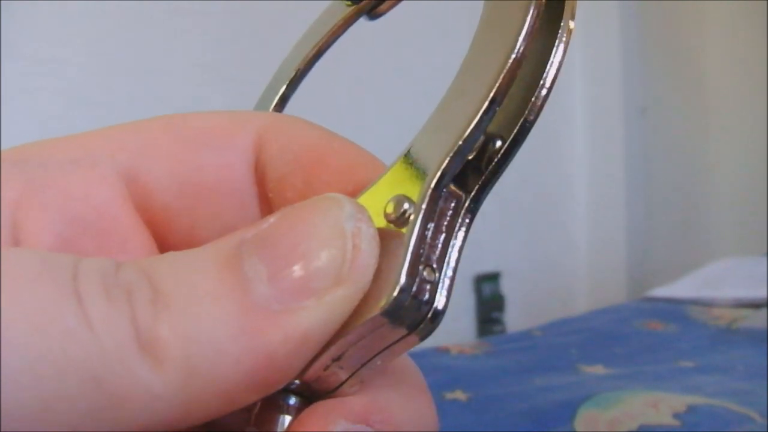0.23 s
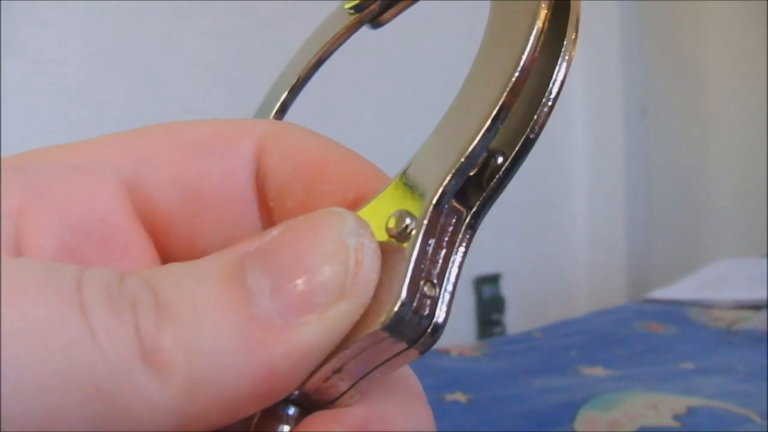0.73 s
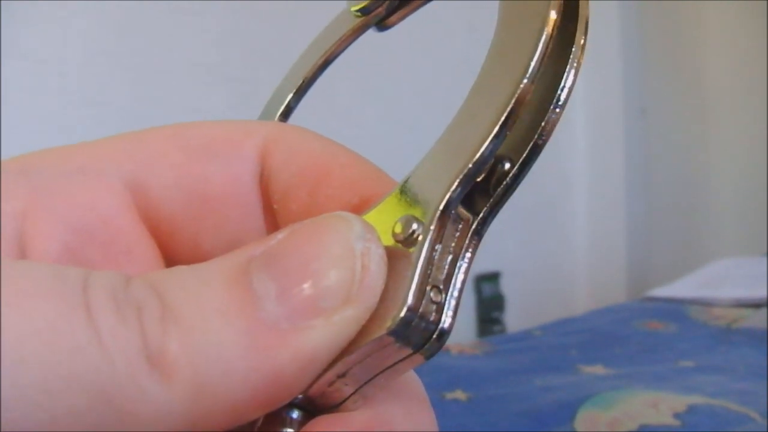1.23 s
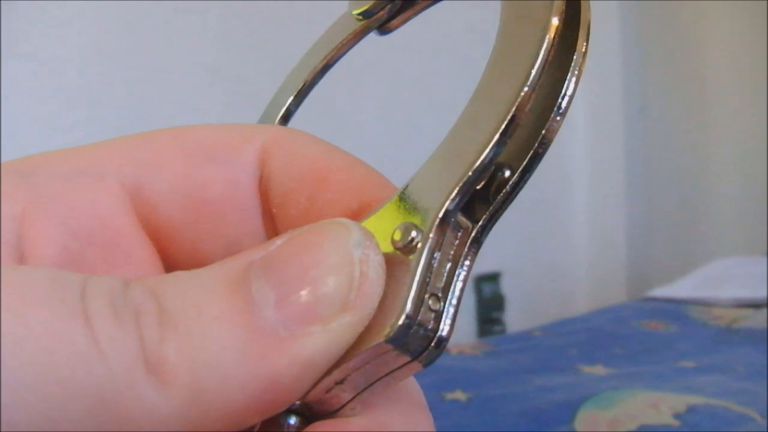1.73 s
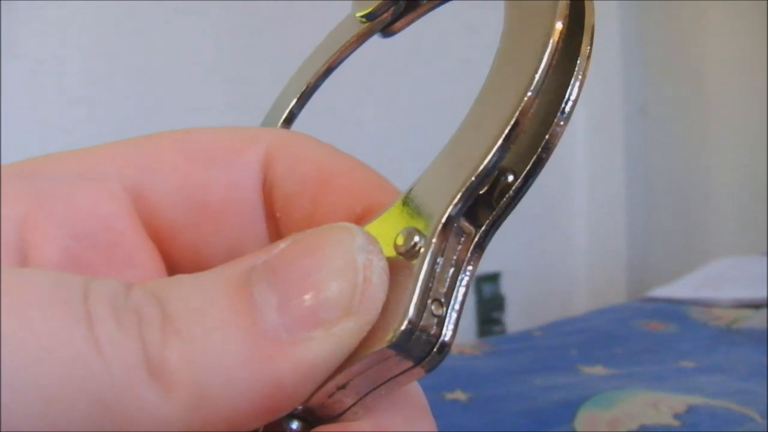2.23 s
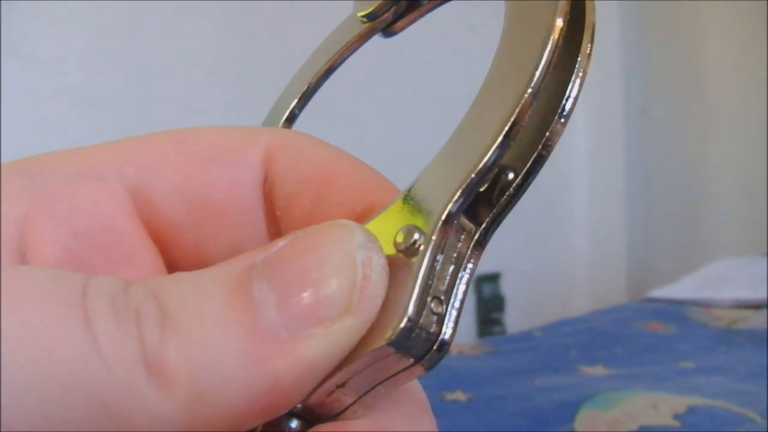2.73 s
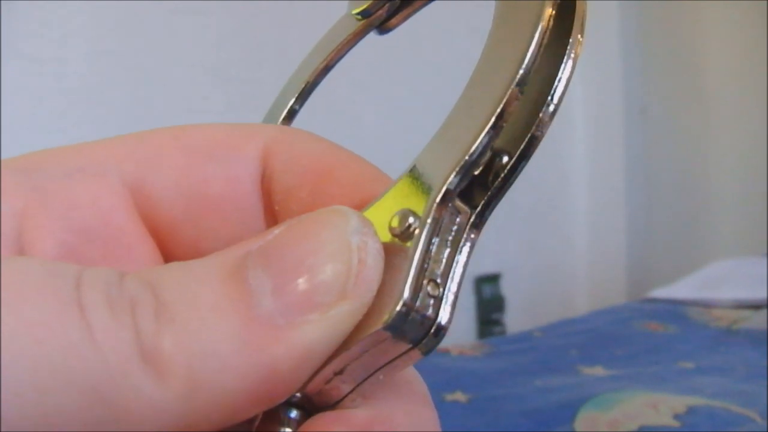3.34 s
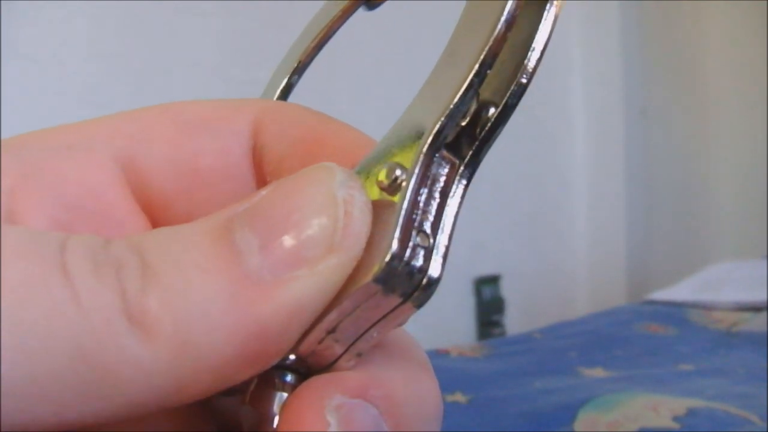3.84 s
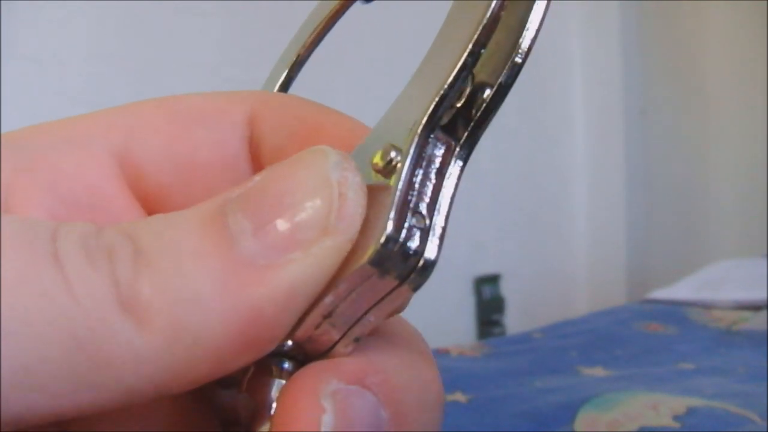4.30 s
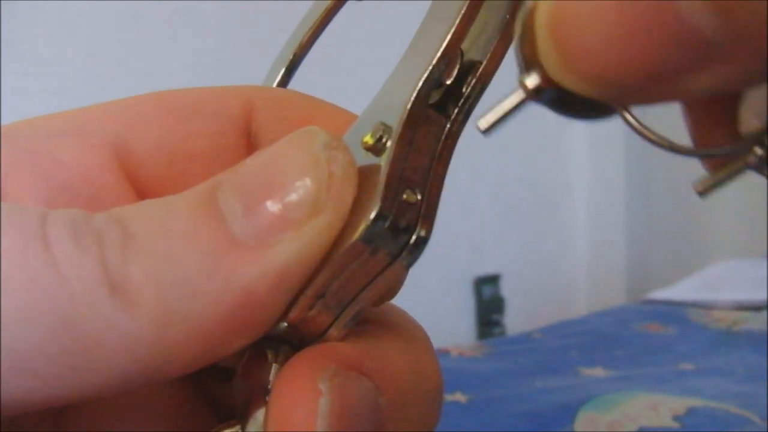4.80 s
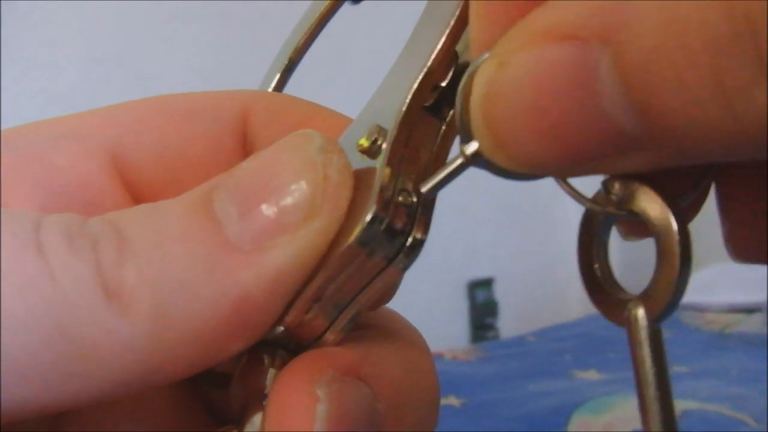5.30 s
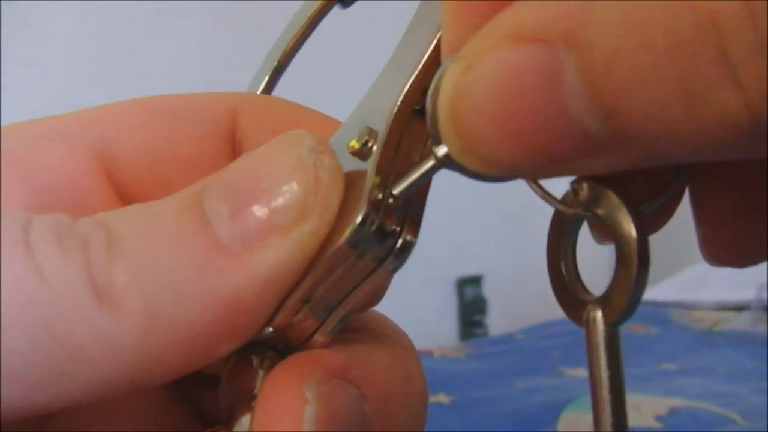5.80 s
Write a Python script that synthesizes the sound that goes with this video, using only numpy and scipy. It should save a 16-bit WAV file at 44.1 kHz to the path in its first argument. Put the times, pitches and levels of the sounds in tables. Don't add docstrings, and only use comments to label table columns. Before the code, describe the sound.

Small steel keys on a ring jingle and tick brightly up close in a quiet bedroom, then one key knocks into a metal lock.

```python
import sys
import numpy as np
from scipy import signal
from scipy.fft import rfft, irfft, next_fast_len
from scipy.io import wavfile
from scipy.ndimage import uniform_filter1d

SR = 44100
rng = np.random.default_rng(int(sys.argv[2]) if len(sys.argv) > 2 else 0)


def wav_out(sig):
    wavfile.write(sys.argv[1], SR, np.round(np.clip(np.atleast_2d(sig).T, -1, 1) * 32767).astype(np.int16))


def volts_from_decibels(level):
    exponent = np.asarray(level, float) / 20
    return 10 ** exponent


N = 266893
EDGE_HZ = 15850

# start in seconds, level of each of the three key modes
# in dB, damping in dB per second (below zero the ring grows).
BLOWS = [(0.6445, -33, -53, -28, 700), (0.7729, -36, -33, -49, 330), (0.8026, -41, -24.5, -46, 200),
         (0.822, -45, -30.5, -50, 20), (0.8863, -45, -59, -46, 150), (0.91, -49, -49, -58, 140),
         (0.936, -48, -45, -54, 570), (0.952, -54.5, -62.5, -51.5, 352), (1.3837, -39, -37.5, -50, 914),
         (1.409, -40, -42, -52, 780), (1.4532, -52, -50.5, -56, -250), (1.477, -45.5, -44, -51, -40),
         (1.564, -36.5, -48, -57, -700), (1.5705, -32.5, -48, -56, 1400), (2.0355, -44, -38.5, -61, 299),
         (2.341, -41, -58, -60, 1000), (2.39, -56, -61, -52, 590.5), (2.507, -24.5, -35, -15.5, 800.5),
         (2.5178, -33, -39, -21.5, 300), (2.522, -37, -27, -36, 620), (2.61, -60, -49, -52.5, 410),
         (2.7055, -43.5, -62, -60, 340), (2.746, -57, -58, -58, 294), (3.633, -39, -62, -64, 2000),
         (4.0736, -35, -42, -28.5, 3000), (4.078, -43.5, -50, -42.5, 700), (5.06, -43, -35, -55, 850),
         (5.2031, -69, -57, -58, 630)]


def evened(x):
    return x / np.sqrt(np.mean(x ** 2) + 1e-20)


def read(points, hz):
    f, value = np.transpose(points)
    return np.interp(np.log(hz + 1), np.log(f + 1), value)


def add(mix, s, sound):
    part = mix[:, round(s * SR):][:, :sound.shape[1]]
    part += sound[:, :part.shape[1]]


def coloured(x, gain):
    size = x.shape[-1]
    fast = next_fast_len(size)
    return irfft(rfft(x, fast) * gain(np.fft.rfftfreq(fast, 1 / SR)), fast)[..., :size]


def hiss():
    # frequency in Hz, level in dB per Hz.
    hiss_colour = [(12, -32), (20, 4), (50, -1), (130, -1.5), (300, -6), (825, -12), (3000, -18.5),
                   (7730, -25), (10500, -28.5), (15200, -33.5), (15800, -40)]
    # frequency in Hz, left over right in dB.
    hiss_balance = [(60, 2.5), (1000, 2), (8000, -0.5)]
    hiss_db, whine_hz, whine_db = -55.5, 10840, -80
    side = np.array([[.5], [-.5]])
    noise = rng.standard_normal((3, N))
    shared = coloured(noise[2], lambda hz: 0.48 + .5 / (1 + hz / 700))

    def microphone(hz):
        return volts_from_decibels(read(hiss_colour, hz) + side * read(hiss_balance, hz)) * (hz < EDGE_HZ)

    noise = coloured(noise[:2] + shared, microphone)
    waver_hz = 25 * evened(uniform_filter1d(rng.standard_normal(N), size=900))
    whine = volts_from_decibels(whine_db + 3.0) * np.sin(2 * np.pi * np.cumsum(whine_hz + waver_hz) / SR)
    return volts_from_decibels(hiss_db + 2.5) * evened(noise) + whine


def direction(t):
    # time in seconds, left over right in dB, left lag in microseconds.
    swing = [(0.645, -4, 93), (0.775, -1, 107), (0.805, -7, 61), (0.9, -7, 91), (1.385, 0, 98),
             (1.46, -1, 84), (2.036, -4, 76), (2.2, -3, 79), (2.508, -1.5, 84), (2.56, 5, 93),
             (2.71, -2, 82), (3.54, -4, 82), (3.75, 2, 73), (3.92, 4, 69), (4.03, 0, 80), (4.075, 2, 68),
             (5.062, -2, 73), (5.203, 4, 66)]
    s, pan_db, lag = np.transpose(swing)
    half_db = np.interp(t, s, pan_db) / 2
    return volts_from_decibels(np.array([half_db, -half_db])), np.interp(t, s, lag) * 1e-6


def contacts():
    # start in seconds, low mode in dB, high mode in dB, damping in dB per second.
    grazes = [(0.385, -56, -69, 1500), (0.542, -65, -73, 500), (0.659, -59, -52, 600),
              (0.846, -43, -34, 600), (1.014, -58, -64, 400), (1.438, -55, -59, 860),
              (1.502, -57, -44, 250), (1.596, -62, -53, 300), (1.636, -39.5, -62, 1260),
              (1.647, -58, -59, 158), (2.059, -53, -48.5, 420), (2.237, -58, -54, 450),
              (2.356, -52, -59, 100), (2.426, -57, -51.5, 146), (2.913, -54.5, -69, 330),
              (3.06, -42, -51.5, 1043), (3.209, -57, -77, 148), (3.464, -57, -59, 225),
              (3.515, -56, -56, 100), (3.534, -53, -49, 340), (3.576, -64, -52, 730),
              (3.789, -59, -72, 120), (3.889, -63, -73, 717), (3.912, -60, -51, 90),
              (3.943, -65, -49.5, 350), (4.007, -60, -52, 900), (4.045, -63, -50, 500),
              (4.086, -55, -44, 350), (4.095, -69, -49.5, 720), (5.074, -58, -46, 150),
              (5.095, -62, -49, 600)]
    # start in seconds, low mode in dB, high mode in dB.
    holds = [(0.785, -46, -38), (1.525, -56, -49.5), (1.538, -48, -49.5), (1.581, -52, -49.5),
             (2.011, -51, -60), (2.191, -53, -56), (2.298, -50, -68), (2.32, -45, -66), (2.413, -52.5, -62),
             (2.554, -54, -42.5), (3.417, -61, -73), (3.552, -71, -49), (3.656, -67, -72),
             (3.727, -69, -59.5), (3.964, -59, -58), (4.026, -47, -48.5), (5.021, -62, -66)]
    # start in seconds, low mode in dB, high mode in dB.
    swells = [(0.519, -62, -83), (0.755, -62, -55), (1.395, -45, -57), (2.171, -52, -63.5),
              (2.211, -65.5, -66), (2.325, -69, -75), (2.586, -74, -46), (2.794, -58, -66)]
    stills = [
        0,
        2.818,
        4.119,
        5.116,
        5.228,
    ]
    hold_db_per_s, swell_db_per_s = 43, 296
    twin_db = -15.5
    light = grazes + [(*r, -hold_db_per_s) for r in holds] + [(*r, -swell_db_per_s) for r in swells]
    rows = BLOWS + [(s, low, high, high + twin_db, damp) for s, low, high, damp in light]
    return np.array(sorted(rows + [(s, -90, -90, -90, 0) for s in stills]))


def ring_levels(t):
    rows = contacts()
    now = np.clip(np.searchsorted(rows[:, 0], t) - 1, 0, None)
    db = rows[now, 1:4].T - rows[now, 4] * (t - rows[now, 0])
    return np.sqrt(np.maximum(volts_from_decibels(2 * db) - volts_from_decibels(2 * -77), 0)), now


def rings():
    key_modes = [7635, 10605, 10725]
    flutter_samples = (170, 300, 300)
    t, starts = np.arange(N) / SR, contacts()[:, 0]
    levels, now = ring_levels(t)
    before, after = (ring_levels(starts + gap)[0].sum(0) for gap in (-1e-4, 1e-4))
    hard = np.isin(starts, [blow[0] for blow in BLOWS])
    raised = after > np.where(hard, 1.3, 3.5) * before
    struck = np.maximum.accumulate(np.where(raised, starts, 0))[now]
    gains, lag = direction(t)
    out = np.zeros((2, N))
    for k, (hz, rough, span) in enumerate(zip(key_modes, (.75, .12, .15), flutter_samples)):
        rough = rough * (1 - np.exp(-(t - starts[now]) / 0.0085))
        flutter = []
        for noise in rng.standard_normal((2, N)):
            smooth = uniform_filter1d(uniform_filter1d(noise, size=span), size=span)
            flutter.append(evened(smooth))
        release = signal.lfilter([.012], [1, -.988], levels[k])
        level = np.maximum(uniform_filter1d(levels[k], size=13), release)
        level = level * (1 + rough * flutter[0]) / np.sqrt(1 + rough ** 2)
        shake = shake if k == 2 else flutter[1]
        turn = 2 * np.pi * hz * (t - struck) + (1.3 if k == 0 else 0.68) * shake
        if k == 0:
            out += level * np.sin([turn + 2.23, turn])
        else:
            out += level * gains * np.sin([turn - 2 * np.pi * hz * lag, turn])
    return coloured(out, lambda hz: (hz < EDGE_HZ) / (1 + (4000 / (hz + 1)) ** 4))


def scrape():
    power = (ring_levels(np.arange(N) / SR)[0] ** 2 * [[2.5], [.05], [.3]]).sum(0)
    keep = np.exp(-1 / (0.0046 * SR))
    slide = signal.lfilter([1 - keep], [1, -keep], power ** 0.27)
    clicks = (rng.random(N) < 1500 / SR) * volts_from_decibels(5.0 * np.minimum(rng.exponential(1, N), 3.5))
    grit = 0.29 + signal.lfilter([1], [1, -.93], clicks)
    grains = rng.standard_normal((2, N)) * grit / grit.mean() * slide
    colour = [(1600, -9), (2350, 2.0), (3300, -18), (5000, -7.0), (7700, 4.0), (9500, -2.0),
              (13500, -3.5), (15800, -6.0)]
    spread = grains + 0.19 * grains[::-1]
    return volts_from_decibels(-37.5) * coloured(spread, lambda hz: volts_from_decibels(read(colour, hz)) * (hz < EDGE_HZ))


def hand(hz):
    palm_share, palm_s = 0.2, 0.000534
    return 1 + palm_share * np.exp(-2j * np.pi * hz * palm_s) / (1 + (hz / 7000) ** 4)


def ticks():
    # frequency in Hz, level in dB, t60 in seconds.
    small_modes = [(7160, -25.5, 0.064), (8530, -7, 0.0052), (9000, -28.5, 0.027), (9150, -23, 0.045),
                   (10600, -13.5, 0.03), (11400, -21, .04), (14500, -30, .015)]
    # start in seconds, peak in dB, top band over middle band in dB, low band in dB.
    cracks = [(0.645, -40, 3, -2), (0.65, -43.5, -5, 0), (0.7677, -42, -3, -19), (0.7738, -26, -3, -20),
              (0.7749, -37, -5, -18), (0.7773, -35, -5, -29), (0.7788, -32, -7, -18), (0.78, -28, -7, -15),
              (0.787, -33, -8, -13), (0.8029, -24, -4, -15.5), (0.8053, -29, -10, -17),
              (0.807, -36, -5, -5), (0.8603, -44, -11, -14), (0.8872, -31.5, -12, -16),
              (0.9277, -43, -1, -10), (0.9423, -30, 2, -9), (1.383, -40.5, 7, -5), (1.3905, -39, 12, -3),
              (1.4, -33, 10, 0), (1.5638, -33, -6, -16), (2.0196, -40, -26, -11), (2.1847, -40, -9, -13),
              (2.3198, -41, -6, -7), (2.3214, -41, -7, 0), (2.3224, -38, -5, -7), (2.357, -35.5, 4, -11),
              (2.3895, -36, -1, -11), (2.5073, -22.5, -4, -14), (2.5177, -28, -4, -22),
              (2.5213, -40, -9, -12), (2.7056, -36, -8, -18), (3.5155, -36, -4, -3), (3.535, -46.5, 8, 7.5),
              (3.6337, -39.5, -1, -9), (4.0535, -50, 14, 9.5), (4.0741, -28.5, -8, -4.5),
              (5.06, -34, 2, -11), (5.0632, -46, -8, -5), (5.0652, -48, -8, -5), (5.2033, -36, 5, -10),
              (5.205, -38, 1, -11), (5.4445, -47.5, -11, 7), (5.98, -57, 2, 12)]
    # start in seconds, peak in dB.
    wire_ticks = [(0.386, -57), (0.937, -50), (0.9458, -40), (0.9495, -54), (1.0337, -59), (1.4925, -50),
                  (1.3955, -54), (1.4089, -46), (1.4388, -47), (1.4533, -46), (1.5095, -48), (2.2383, -43),
                  (2.3413, -41), (2.4139, -49), (2.5039, -37), (3.4184, -47), (3.47, -45), (3.617, -46),
                  (3.69, -54), (3.727, -54), (3.8356, -53), (4.0255, -39), (4.108, -52), (5.1022, -48),
                  (5.1685, -56), (5.172, -55)]
    flat_ticks = [(0.8905, -34), (1.5698, -42), (1.5722, -39), (1.5752, -44), (1.901, -48), (1.9569, -46),
                  (2.0358, -40), (2.177, -48), (2.1881, -43), (2.1925, -47), (2.2986, -45), (2.3036, -40),
                  (2.326, -49), (2.8012, -50), (3.0614, -42), (3.2138, -46), (3.4948, -43), (3.68, -41),
                  (4.0768, -38), (5.087, -46), (5.0961, -42), (5.2177, -49), (5.228, -54)]
    shank_ticks = [(1.5029, -45), (1.6362, -48), (3.9128, -50), (3.9485, -44.5), (3.9652, -43.5),
                   (4.046, -42), (4.0873, -47)]
    # top band over middle band in dB, low band in dB.
    wire = (5.6, -4)
    flat = (-15, -8.5)
    shank = (-1, 1.4)
    out, t = np.zeros((2, N)), np.arange(2048) / SR
    light = []
    for rows, part in ((wire_ticks, wire), (flat_ticks, flat), (shank_ticks, shank)):
        light += [(*row, *part) for row in rows]
    for s, db, top_db, low_db in cracks + light:
        noise = rng.standard_normal((3, len(t)))
        chance = rng.standard_normal((len(small_modes), 2))
        middle_db = -10 * np.log10(1 + volts_from_decibels(2 * top_db))
        edge_db = middle_db + top_db - 12 + .6 * min(db + 41, 0)
        shape = [(1200, low_db - 15.0), (2200, low_db + 4.0), (4800, low_db + 1.5), (8800, middle_db),
                 (13500, middle_db + top_db), (16500, edge_db), (16800, -71)]
        hard_db = .3 * (db + 38)
        crack = volts_from_decibels(9.0 + hard_db) * (t == 0) + volts_from_decibels(-2.0) * noise[0] * volts_from_decibels(-60 * t / 0.0023)
        fizz = np.gradient(.5 * noise[0] + 1.14 * noise[1:], axis=1)
        tail = volts_from_decibels(-8.0 - hard_db - 60 * t / 0.031) * fizz
        crack = crack + coloured(tail, lambda hz: hz < EDGE_HZ)
        side = 0
        for (f, d, t60), (a, b) in zip(small_modes, chance):
            side = side + volts_from_decibels(d + 2.1 * a - 60 * t / t60) * np.sin(2 * np.pi * f * (1 + 0.0058 * b) * t)
        gains, lag = direction(s)
        delay = np.array([[lag], [0]]) + 64 / SR

        def path(hz):
            return volts_from_decibels(read(shape, hz)) * hand(hz) * np.exp(-2j * np.pi * hz * delay)

        add(out, s - 72 / SR, volts_from_decibels(db + 3.0) * gains[:, None] ** .5 * coloured(crack + side, path))
    return out


def rumble():
    # centre time in seconds, level in dB, centre frequency in Hz, length in seconds.
    cloth_swells = [(.65, -58, 173, 0.034), (1.912, -55.5, 406, 0.04), (2.031, -57, 272, 0.023),
                    (2.16, -55, 198, 0.041), (2.328, -55, 79, 0.046), (3.02, -57, 185, 0.061),
                    (3.247, -55, 249, 0.046), (3.579, -63, 214, 0.12), (1.982, -58.5, 101, 0.049),
                    (4.192, -69, 2310, 0.04), (4.37, -64, 2300, 0.026)]
    out, t = np.zeros((2, N)), np.arange(16384) / SR - .18
    for s, db, centre_hz, length in cloth_swells:
        noise = rng.standard_normal(len(t))
        lump = coloured(noise, lambda hz: np.exp(-(np.log((hz + 1) / centre_hz) / 0.37) ** 2))
        add(out, s + t[0], volts_from_decibels(db) * evened(lump) * np.exp(-(t / length) ** 2) * np.ones((2, 1)))
    return out


def rattle():
    # start in seconds, length in seconds, level in dB.
    chatters = [(0.768, 0.049, -51), (0.808, 0.08, -56), (0.88, 0.075, -53.5), (1.38, .06, -55.5),
                (1.49, 0.027, -62), (1.56, 0.017, -56), (2.168, .04, -62), (2.297, .075, -57),
                (2.405, .02, -59), (3.408, 0.13, -65), (3.672, .03, -59.5), (3.798, 0.087, -67),
                (3.94, 0.053, -63), (4.025, .03, -61), (5.02, 0.044, -65), (5.08, 0.021, -61)]
    t = np.arange(N) / SR
    busy = sum(volts_from_decibels(db) * ((t > s) & (t < s + length)) for s, length, db in chatters)
    clicks = (rng.random(N) < 900 / SR) * volts_from_decibels(4.5 * np.minimum(rng.exponential(1, N), 3.5))
    grit = 0.36 + signal.lfilter([1], [1, -.95], clicks)
    left, right, both = rng.standard_normal((3, N))
    colour = [(3000, -21), (6000, -11), (8500, -1.5), (12000, -1.5), (15500, -1.5)]  # Hz, dB
    grains = grit * (both + np.array([left, right]))
    grains = coloured(grains, lambda hz: volts_from_decibels(read(colour, hz)) * (hz < EDGE_HZ))
    return uniform_filter1d(busy, size=250) * evened(grains)


def knocks():
    # start in seconds, peak in dB, frequency in Hz (below zero it pulls inward first),
    # t60 in seconds, rise in seconds.
    lone_rings = [(1.483, -36, -68, 0.073, 0.0035), (1.509, -41.5, 140, 0.074, 0.0017),
                  (1.935, -36.5, 191, 0.051, 0.002), (2.531, -31, 63, 0.057, 0.0022),
                  (.803, -56, 5578, .2, .0003), (1.572, -61, 12680, 0.36, .001),
                  (2.512, -57, 2384, 0.091, .002), (4.0, -45, 2193, 0.021, 0.0005),
                  (3.516, -47.5, 2304, .025, 0.00046), (5.0602, -41, 4900, 0.005, 0.0001),
                  (5.064, -44, 6400, 0.008, 0.0002), (5.2036, -44, 4300, 0.006, 0.0001),
                  (5.4375, -23, -165, 0.025, 0.0032), (5.4442, -36, -1860, 0.0055, 0.00004),
                  (5.4442, -39, -153, 0.011, 0.0001)]
    # peak in dB, frequency in Hz
    # (signed as above), t60 in seconds, rise in seconds.
    bump = [(-32, -73, 0.15, 0.0016), (-39.5, -258, 0.083, 0.00073), (-41.5, -603, 0.041, 0.00064),
            (-46.5, -845, 0.077, 0.00082), (-50, -1180, 0.041, 0.00076), (-48, 1900, 0.015, 0.00033)]
    lock = [(-22, 835, 0.0175, 0.0003), (-19, 1115, 0.0125, 0.00011), (-16, 458, 0.014, 0.0017),
            (-28, 1740, 0.007, 0.00016), (-19, 2360, 0.0055, 0.00075), (-33, -90, 0.06, 0.003)]
    # start in seconds, peak in dB.
    probes = [
        (5.712, -39),
        (5.812, -42),
        (5.836, -43),
        (5.98, -36),
    ]
    # frequency in Hz, t60 in seconds, rise in seconds.
    probe = (1010, 0.027, 0.0018)
    bump_s, lock_s = 1.502, 5.4306
    out, t = np.zeros((2, N)), np.arange(8000) / SR
    struck = [(bump_s, *m) for m in bump] + [(lock_s, *m) for m in lock] + [(*p, *probe) for p in probes]
    for s, db, hz, t60, rise in lone_rings + struck:
        swell = 1 - np.exp(-(t / (2 * rise)) ** 2)
        ring = volts_from_decibels(db - 60 * t / t60) * swell * np.sin(2 * np.pi * hz * t)
        add(out, s, ring * volts_from_decibels(np.array([[.8], [-.8]])))
    return out


def squeak():
    # time in seconds, level in dB, frequency in Hz.
    glide = [
        (1.988, -48, 840),
        (1.992, -44, 900),
        (1.997, -46, 1070),
        (2.005, -39.5, 1190),
        (2.0095, -50, 1200),
        (2.0115, -52, 800),
        (2.02, -56, 780),
        (2.029, -55, 720),
    ]
    s, db, hz = np.transpose(glide)
    t = np.arange(N) / SR
    slips = 1 + 0.028 * evened(uniform_filter1d(rng.standard_normal(N), size=90))
    turn = 2 * np.pi * np.cumsum(np.interp(t, s, hz) * slips) / SR
    tone = volts_from_decibels(np.interp(t, s, db, -120, -120)) * np.sin(turn)
    return tone * volts_from_decibels(np.array([[1.6], [-1.6]]))


def room(x):
    t = np.arange(6000) / SR
    sparse = rng.standard_normal((2, len(t))) * (rng.random((2, len(t))) < .05)
    taps = sparse * volts_from_decibels(-60 * t / 0.18) * (t > .003)
    taps = coloured(taps, lambda hz: hz < EDGE_HZ)
    return signal.fftconvolve(x, taps / np.linalg.norm(taps[0]), axes=1)[:, :N]


def scene():
    hits, thuds = ticks(), knocks()
    tail = volts_from_decibels(-11.5) * room(hits + 0.55 * thuds)
    keys = rings() + hits + scrape() + rattle()
    return keys + thuds + tail + squeak() + rumble() + hiss()


def top_cut(x):
    return signal.sosfilt(signal.butter(12, 16680, fs=SR, output="sos"), x)


def record(dry):
    power_db = 10 * np.log10(abs(uniform_filter1d((dry ** 2).mean(0), size=2000)) + 1e-12)
    fall = np.arange(N) * 24.0 / SR
    over_db = np.maximum(np.maximum.accumulate(power_db + fall) - fall + 40.5, 0)
    late_db = np.roll(uniform_filter1d(over_db, size=1500), shift=1500)
    return top_cut(dry / volts_from_decibels(0.23 * late_db))


dry = scene()
out = record(dry)
wav_out(out)
```